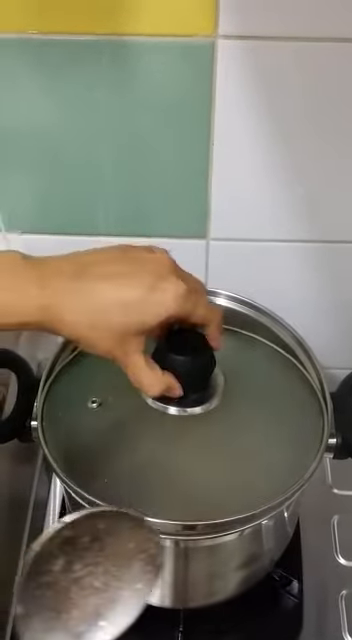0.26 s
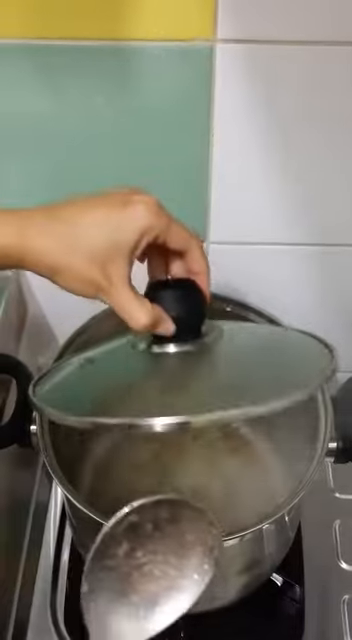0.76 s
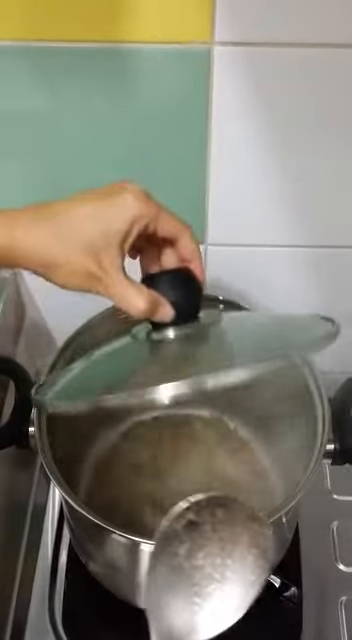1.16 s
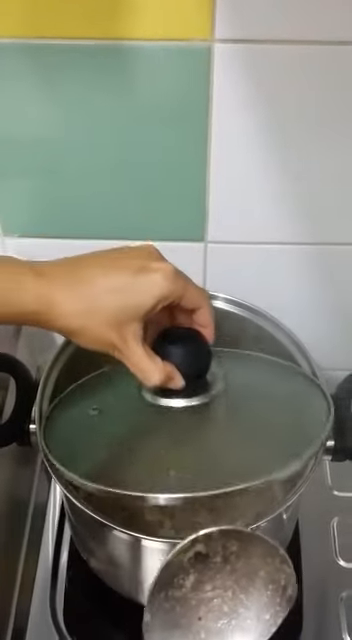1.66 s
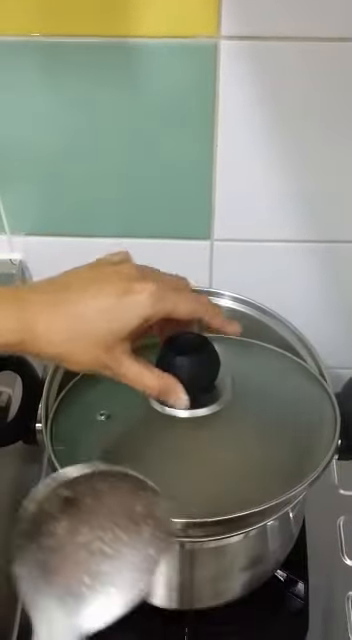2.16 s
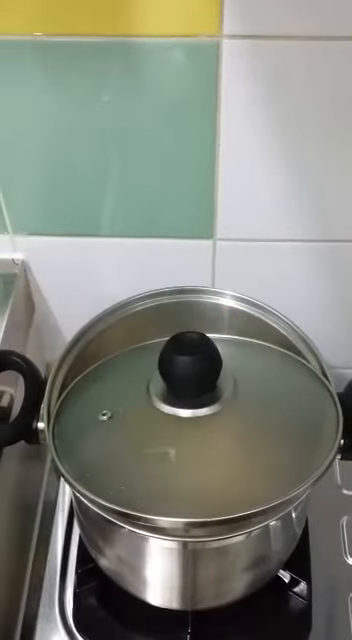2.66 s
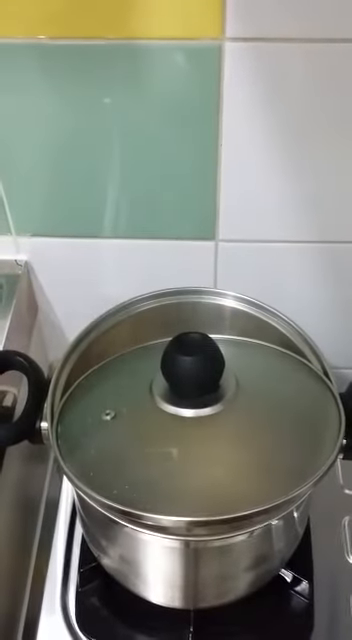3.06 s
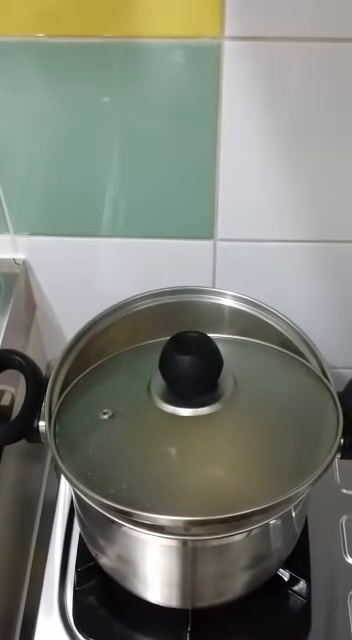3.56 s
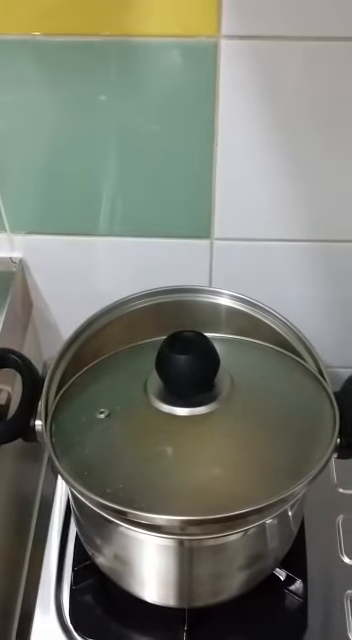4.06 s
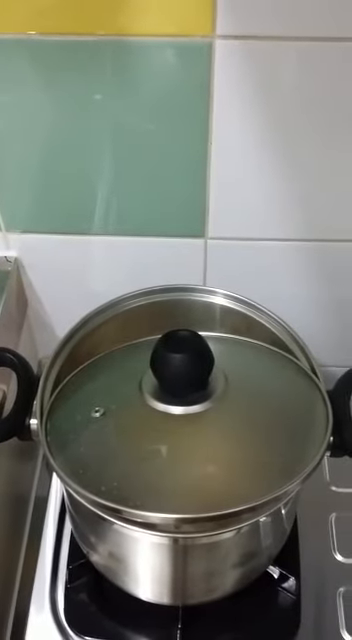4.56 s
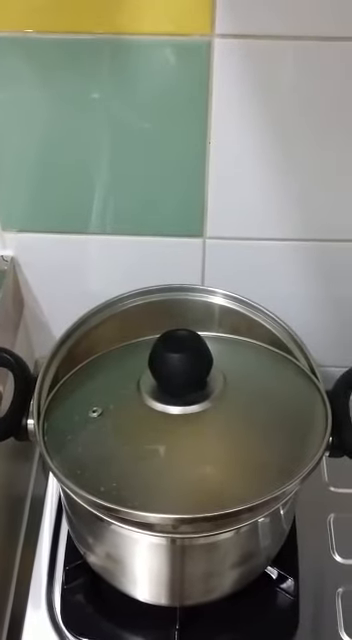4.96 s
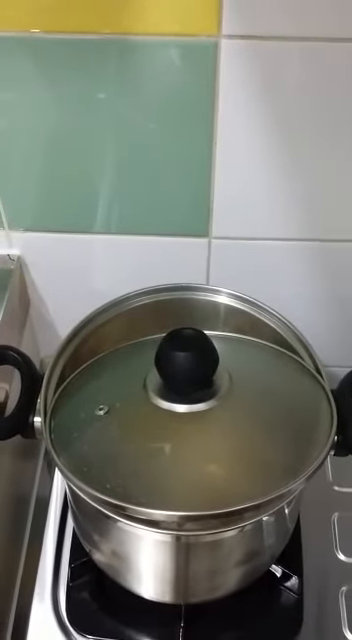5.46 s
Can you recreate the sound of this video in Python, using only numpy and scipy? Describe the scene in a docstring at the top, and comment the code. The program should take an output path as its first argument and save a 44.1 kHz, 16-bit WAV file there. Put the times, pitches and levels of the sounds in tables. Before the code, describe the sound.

A continuous crackling hiss of hot oil, with a resonant metallic pot tone and a low fluttering burner roar. The lid opens and closes early, and something hollow knocks softly about a quarter of the way in. Scattered water drops crack and rattle, with a loud cluster late on. Near microphone, hard kitchen walls, slightly gurgly processed sound with softened top treble.

```python
"""Spice paste sizzles in hot oil in a steel pot: dense random bubble bursts, echoed by the walls and coloured.
The glass lid is lifted and lowered again, which retunes the noise-driven resonances of the air in the pot.
Drops of water spit as cracks with decaying noise, steam jets hiss in narrow bands, and something hollow
bumps dully as a sum of damped modes. Beneath lies the low noise of a gas flame, in a tiled kitchen.
A limiter ducks the loud moments, a noise gate shuts weak patches of the spectrum, and the treble is cut."""
import sys
import numpy as np
from scipy import signal
from scipy.fft import rfft, irfft, next_fast_len
from scipy.io import wavfile
from scipy.ndimage import uniform_filter1d, minimum_filter1d

SR = 44100
rng = np.random.default_rng(int(sys.argv[2]) if len(sys.argv) > 2 else 0)


def dump_mix(stems):
    """Bounce the given channels to the path in sys.argv[1] as a 16-bit WAV at rate SR."""
    frames = np.atleast_2d(stems).T  # one column per channel
    limited = np.clip(frames, -1, 1)  # hard clip at full scale
    pcm = np.round(limited * 32767).astype(np.int16)
    wavfile.write(sys.argv[1], SR, pcm)


N = 251772
TIME, HZ = np.arange(N) / SR, np.fft.rfftfreq(N, 1 / SR)  # [s], [Hz]

# strength of the frying: (time [s], swell [dB])
FRYING_SWELL = [(0.0, 1), (0.28, 0.3), (0.46, 1.8), (0.6, 3.4), (0.78, 1.5), (0.88, 1.8), (1.0, 1),
                (1.27, -0.6), (1.75, -0.2), (2.1, 0.5), (2.62, 2), (2.8, 1.2), (3.33, 0.5), (4.0, -0.5),
                (4.4, -0.5), (4.68, 0.1), (5.0, -1.2), (5.45, -0.5), (5.7, -1.5)]
# colour of the sizzle, before trims: (frequency [Hz], left density [dB per Hz], right density [dB per Hz])
SIZZLE_SPECTRUM = [(504, -75.5, -77), (1110, -73, -70), (1760, -69.5, -63.5), (2330, -68, -63),
                   (2650, -65.5, -60), (2830, -63.5, -62), (3020, -64.5, -61.5), (3930, -62.5, -61),
                   (5200, -62.5, -61), (5840, -60.5, -62), (6750, -56, -63), (7350, -57, -61.5),
                   (7970, -60, -57.5), (8380, -63, -54.5), (8760, -65.5, -50), (9260, -64.5, -54.5),
                   (9800, -65, -58), (11460, -66, -61), (14000, -65, -61.5)]
# motion of the lid: (time [s], opening [0-1], slide from its first seat to its last [0-1])
LID_MOTION = [(0, 0, 0.05), (.35, 0.45, 0), (.7, 0.85, 0.21), (1.05, 0.96, 0.51), (1.4, 0.9, .55),
              (1.8, 0.02, .9), (2.15, 0, 0.99)]
BODY_SWELL = 0.6  # share of each swell [dB] that the coarse bubbling and the pot follow
HISS_DB, BODY_DB = 0.18, 0.77  # trims of the hiss and of the coarse bubbling
FIZZ_DB, FIZZ_OPEN_DB, FIZZ_DB_PER_S = 0.56, 0.5, -0.2  # finest fizz: at first, gain with lid open, fading


def sizzle():
    """Superposition of random bursts: dense crackle, its diffuse wash and the ringing pot swell together."""
    swell_db = over_time(FRYING_SWELL)[0]
    opening, slide = over_time(LID_MOTION)
    crackle = bubbles(per_s=5000, spread_db=3.5, ring_s=0.059, direct=0.37, count=12)
    crackle = crackle * amp(0.31 * drift(top_hz=17))  # bubbles come in clusters
    wash = amp(-4) * rng.standard_normal((2, N))  # the room smears them to a smooth hiss
    grain = unit(crackle + wash + amp(-10.5) * pings() + amp(-12) * pops())
    sound = colour(grain, SIZZLE_SPECTRUM)
    spectrum = rfft(sound)
    fizz = irfft(spectrum * np.clip((HZ - 8500) / 2500, 0, 1), N)
    body = irfft(spectrum * np.clip((4500 - HZ) / 2500, 0, 1), N)
    fizz_db = FIZZ_DB + FIZZ_OPEN_DB * opening + FIZZ_DB_PER_S * TIME
    hiss = sound - body + fizz * (amp(fizz_db) - 1)
    hiss = hiss * amp(swell_db + HISS_DB)
    hiss = hiss * pan(0.62 * slide - .6)  # the gap beside the lid turns the hiss leftward
    return hiss + (body * amp(BODY_DB) + pot_air()) * amp(BODY_SWELL * swell_db)


def bubbles(per_s, spread_db, ring_s, direct, count):
    """Convolution of impulses with wall echoes: tiny steam bubbles burst at many spots between steel walls."""
    t, out = np.arange(SR // 16) / SR, np.zeros((2, N))
    bursts = random_sizes(spread_db, most=4) * (rng.random(N) < per_s / SR)
    spot = rng.integers(0, count, N)
    for k in range(count):
        walls = unit(rng.standard_normal((2, len(t))) * amp(-60 * t / ring_s))
        snap = unit(rng.standard_normal((2, len(t))) * np.exp(-t / 0.00062))
        here = (bursts * (spot == k))[None]
        out += signal.oaconvolve(here, walls + direct * snap, axes=1)[:, :N]
    return unit(out)


def pings(count=2400, spread_db=3.0, ring_s=0.088):
    """Damped oscillation: larger bubbles ring for an instant, each at its own pitch, and coarsen the grain."""
    t, out = np.arange(SR // 32) / SR, np.zeros((2, N))
    onset = 1 - np.exp(-t / 0.00053)
    for when, pitch, size, side, lag in rng.random((count, 5)):
        turns = (1800 + 12500 * pitch) * t + np.array([[0], [lag]])  # cycles; lag is on the right
        db = spread_db * min(-np.log(size), 3) - 60 * t / ring_s
        ping = np.sin(2 * np.pi * turns) * amp(db) * onset
        add(out, when * N / SR, ping * pan(12 * (side - .5)))
    return unit(out)


def pops(per_s=260, spread_db=4.0, count=6):
    """Interaural delay: sharp pops of fat reach the two microphones with another delay from each spot."""
    out = np.zeros((2, N))
    for lag in rng.integers(-5, 6, count):  # samples
        train = random_sizes(spread_db, most=3) * (rng.random(N) < per_s / count / SR)
        out += np.array([train, np.roll(train, lag)])
    return unit(out)


def random_sizes(spread_db, most):
    """Exponential statistics: impulse heights whose levels scatter upward, with either sign."""
    return amp(spread_db * np.minimum(rng.exponential(1, N), most)) * rng.choice([-1, 1], N)


# brief dips of the sizzle: (centre time [s], width between 1/e points [s], change [dB])
SIZZLE_DIPS = [(0.205, .05, -1.5), (0.863, 0.025, -3.5), (1.247, 0.079, -1), (1.466, 0.024, -3),
               (2.83, 0.045, -3), (5.57, 0.022, -2.5)]


def lulls():
    """Amplitude modulation: Gaussian dips in the gain of the sizzle and the pot air."""
    return amp(sum(db * np.exp(-(2 * (TIME - s) / length) ** 2) for s, length, db in SIZZLE_DIPS))


# air modes of the pot, before trims: (frequency at first seat [Hz], frequency at last seat [Hz],
# bandwidth [Hz], level at first seat [dB], level at last seat [dB], change with lid open [dB],
# phase lead of the left [rad], left-right difference [dB])
AIR_MODES = [(322, 323, 35, -36.5, -44.5, -9.5, 0, -4.5), (398, 392, 26, -68, -46, -6, 1.5, -4.5),
             (441, 425, 46, -48.5, -51, 7.5, 0.5, -3), (831, 855, 22, -48, -49.5, -4, 1, -3),
             (960, 959, 11, -46, -49.5, -3, 1, -6), (1212, 1170, 63, -46.5, -49.5, -3.5, 0, -6),
             (1345, 1305, 80, -38.5, -39.5, -1, -2, -6), (1450, 1440, 65, -35.5, -40, -6, 4.5, -4.5),
             (2014, 1927, 60, -44, -41.5, -1.5, 1.34, -1), (2226, 2102, 78, -37.3, -38.2, -0.5, 0, -4.5),
             (2690, 2430, 55, -42, -38, -10, 0, -0.5), (3950, 3620, 170, -36, -47, -6, -3, 4.5),
             (4680, 4597, 75, -34, -35.5, -2, 2, -2), (5710, 5430, 120, -41, -34.5, -1, 2.5, 2)]
POT_WANDER, POT_SWELL_DB = 0.00607, 1.32  # shifting steam: rms detuning (share of pitch), rms swell


def pot_air():
    """Cavity resonance: the frying keeps the air modes ringing; the lid retunes them and changes their levels."""
    opening, slide = over_time(LID_MOTION)
    out = np.zeros((2, N))
    for first_hz, last_hz, width, first_db, last_db, open_db, lead, side_db in AIR_MODES:
        hz = first_hz + (last_hz - first_hz) * slide
        hz = hz * (1 + POT_WANDER * drift(top_hz=9))
        carrier = np.exp(2j * np.pi * np.cumsum(hz) / SR)
        r = np.exp(-np.pi * width / SR)
        # complex noise, low-passed twice, becomes a narrow band around the carrier
        noise = rng.standard_normal(N) + 1j * rng.standard_normal(N)
        noise = signal.lfilter([1 - r], [1, -r], noise)
        noise = unit(signal.lfilter([1 - r ** 2], [1, -r ** 2], noise))
        level_db = first_db + (last_db - first_db) * slide + open_db * opening
        ring = noise * carrier * amp(level_db + POT_SWELL_DB * drift(top_hz=11))
        out += np.sqrt(2) * np.array([ring * np.exp(1j * lead), ring]).real * pan(side_db)
    return out * amp(-1.5)


# loud spitting drops, before colouring: (time [s], level [dB], t60 [s], left-right difference [dB])
LOUD_DROPS = [(.080, -11, .06, -2), (.5586, -14, .056, 9), (.9393, -17, 0.067, 4), (.997, -14, .05, 0),
              (1.216, -16, .04, 5), (1.796, -17, .035, 0), (2.093, -12.5, .04, 2), (2.585, -10.5, 0.055, 2),
              (2.702, -12, .08, 0), (2.8466, -11, 0.041, -1), (3.310, -14, .05, 0), (3.493, -16, .035, 0),
              (3.683, -13.5, 0.049, -4), (4.145, -13, .08, 1), (4.2208, -6.5, 0.08, -1),
              (4.2262, -9.5, 0.07, 1), (4.2570, -8.5, 0.075, 2), (4.334, -17, .03, 0),
              (4.350, -15, .035, 0), (5.207, -17, .04, 2), (5.368, -11.5, 0.039, -4),
              (5.5694, -13, 0.034, -3)]
SNAP_DB, SNAP_S = 2, .0003  # bursting crack: level over its spurt, decay time


def spits():
    """Flash boiling: a drop of water turns to steam with a sharp crack and a spurt that rattles round the pot."""
    t, out = np.arange(SR // 5) / SR, np.zeros((2, N))
    crack = amp(SNAP_DB) * np.exp(-abs(t - .0013) / SNAP_S)
    for s, db, ring_s, side_db in list(LOUD_DROPS) + small_drops():
        spurt = amp(-60 * t / ring_s) * (1 - 0.5 * np.exp(-t / 0.0024))
        noise = rng.standard_normal((2, len(t)))
        add(out, s, amp(db) * noise * (spurt + crack) * pan(side_db))
    # nearly the colour of the sizzle, without its lows
    tone = amp(0.98 * over_hz(SIZZLE_SPECTRUM, HZ)) * HZ ** 2 / (HZ ** 2 + 2400 ** 2)
    out = irfft(rfft(out) * unit(tone), N)
    return out + amp(-14.0) * kitchen(out)


# faint drops: mean rate, level and its scatter, t60, scatter of the left-right difference
DROPS_PER_S, DROP_DB, DROP_SCATTER_DB, DROP_RING_S, DROP_SIDE_DB = 5, -27, 1, 0.027, 5


def small_drops(count=40):
    """Poisson process: faint drops fall at random moments, as rows like those of LOUD_DROPS."""
    times = np.cumsum(rng.exponential(1, count) / DROPS_PER_S)
    scatter = rng.standard_normal((count, 2))
    return [(s, DROP_DB + DROP_SCATTER_DB * size, DROP_RING_S, DROP_SIDE_DB * side)
            for s, (size, side) in zip(times, scatter)]


# jets of steam: (time [s], length [s], centre frequency [Hz], bandwidth at -6 dB [Hz], level before fades [dB])
STEAM_JETS = [(0.546, 0.097, 4500, 1600, -27), (2.428, 0.044, 2388, 119.2, -34),
              (2.979, 0.11, 4596, 252, -30), (4.41, .22, 2323, 450, -35), (4.615, 0.11, 4610, 120.4, -35),
              (4.722, 0.062, 4600, 110.4, -28)]


def jets():
    """Jet noise: pockets of steam escape through the paste, each a brief pitched band of noise."""
    t, out = np.arange(SR // 3) / SR, np.zeros((2, N))
    hz = np.fft.rfftfreq(len(t), 1 / SR)
    for s, length, pitch_hz, width, db in STEAM_JETS:
        resonance = 1 / (1 + (2 * (hz - pitch_hz) / width) ** 2)
        hiss = irfft(rfft(rng.standard_normal((2, len(t)))) * resonance, len(t))
        add(out, s, amp(db) * unit(hiss) * np.sin(np.pi * np.minimum(t / length, 1)))
    return out


# dull bumps, before trims: (time [s], level [dB], brightness [dB per octave; also dB on scuff and tick],
# pitch ratio, scuff level [dB])
BUMP_BLOWS = [(1.369, -31, 0, 1, -4), (1.376, -24.5, 1.5, 1.3, -5), (1.392, -30, 8, 1.04, 0),
              (1.411, -32, 2, 1, -1), (1.437, -26, 2.5, 1, -1), (1.462, -31, -2, 1, -3),
              (1.512, -34.5, 8, 1.05, -6), (1.562, -22.5, 0, 1.1, -4), (1.585, -29, 1, 1.15, -2),
              (1.607, -30.5, 4, 1, -1), (1.662, -34, 1, 1, 0), (1.885, -31.5, -5, 1.03, -4)]
# modes of the bumped thing: (frequency before the pitch ratio [Hz], relative level [dB], t60 [s])
HOLLOW_MODES = [(196, -7, 0.094), (260.8, -2, 0.1), (323, 2.5, 0.21), (388, 0.5, 0.11), (470, -6, 0.05),
                (615, -11, .05), (794, -8, 0.061), (1000, -7, 0.063), (1440, -2.5, 0.033),
                (1900, -8, 0.043)]


def bumps(attack_s=0.0015, tick_db=-3, tick_s=0.0024):
    """Modal synthesis: blows on something hollow, with a tick of contact and a scuff, spread by the room."""
    t, out = np.arange(SR // 3) / SR, np.zeros((2, N))
    for s, db, tilt_db, pitch, scuff_db in BUMP_BLOWS:
        ring = 0
        for hz, mode_db, t60 in HOLLOW_MODES:
            level = amp(mode_db + tilt_db * np.log2(hz / 400) - 60 * t / t60)
            turns = hz * pitch * rng.uniform(0.96, 1.02) * t + rng.random()
            ring = ring + level * np.sin(2 * np.pi * turns)
        scuff = band(rng.standard_normal((2, len(t))), low_hz=198, high_hz=850)
        scuff = unit(scuff + 0.37 * scuff[::-1])  # each side leaks into the other
        scuff = amp(scuff_db + tilt_db) * scuff * amp(-60 * t / 0.13)
        tick = unit(band(rng.standard_normal(len(t)), low_hz=500, high_hz=3500))
        tick = tick * amp(tick_db + tilt_db) * np.exp(-t / tick_s)
        add(out, s, amp(db) * (tick + (ring + scuff) * (1 - np.exp(-t / attack_s))))
    out = out + scrapes()
    return (amp(-4.0) * out + amp(-11) * kitchen(out)) * pan(-2.4)


# scrapes, before trims: (time [s], length [s], level before the fade [dB])
SCRAPE_DRAGS = [(1.385, .12, -30), (1.565, .18, -30.5)]


def scrapes(slips_per_s=260, spread_db=3):
    """Stick-slip friction: after the harder blows surfaces drag in uneven slips that die away."""
    t, out = np.arange(SR // 4) / SR, np.zeros((2, N))
    for s, length, db in SCRAPE_DRAGS:
        sizes = amp(spread_db * rng.standard_normal((2, len(t)))) * rng.choice([-1, 1], len(t))
        slips = sizes * (rng.random(len(t)) < slips_per_s / SR)
        drag = unit(band(slips, low_hz=347, high_hz=1300))
        add(out, s, amp(db) * drag * np.sqrt(np.maximum(1 - t / length, 0)))
    return out


# colour of the gas flame, before trims: (frequency [Hz], density [dB per Hz])
FLAME_SPECTRUM = [(20, -82), (48, -74), (62, -66.5), (84, -53), (118, -53), (140, -65.5), (230, -64.5),
                  (350, -67.5), (520, -71), (700, -69.5), (900, -72.5), (2000, -91)]
# likeness of the flame at the two microphones: (frequency [Hz], correlation [0-1])
FLAME_LIKENESS = [(25, 0.2), (90, 0.99), (250, 0.91), (450, 0.42), (800, 0.3)]
FLAME_DB, FLAME_OPEN_DB, FLAME_WAVER_DB = -0.65, -0.5, 0.93  # trim, change with lid open, rms slow wavering


def flame():
    """Combustion noise: a low, fluttering roar, most alike at the two microphones in its bass."""
    a, b = rfft(rng.standard_normal((2, N)))
    same = np.clip(over_hz(FLAME_LIKENESS, HZ)[0], 0, 1)
    pair = irfft(np.array([a, same * a + np.sqrt(1 - same ** 2) * b]), N)
    opening = over_time(LID_MOTION)[0]
    level_db = FLAME_DB + FLAME_OPEN_DB * opening + FLAME_WAVER_DB * drift(top_hz=3.2)
    return colour(pair, FLAME_SPECTRUM) * pan(-2.3) * amp(level_db)


# reverberation of the kitchen: (frequency [Hz], t60 [s])
ROOM_DECAY = [(150, 0.29), (500, 0.53), (2000, 0.61), (8000, 0.33), (15000, 0.16)]


def kitchen(x):
    """Reverberation: convolution with a noise tail in which each band decays at its own speed."""
    hz, t, z = signal.stft(rng.standard_normal((2, SR // 2)), SR, nperseg=256)
    decay = amp(-60 * t / over_hz(ROOM_DECAY, hz).T)
    onset = 1 - np.exp(-t / 0.0096)
    tail = signal.istft(z * decay * onset, SR, nperseg=256)[1]
    return signal.fftconvolve(x, tail / np.linalg.norm(tail[0]), axes=1)[:, :N]


# threshold of the noise gate at median loudness: (frequency [Hz], level against the usual one there [dB])
GATE_THRESHOLD = [(100, -12), (200, -4.8), (420, -4), (540, .3), (800, .3), (1080, -.9), (1300, -5.5),
                  (1650, -4.2), (2000, -6.5), (2600, -5.5), (3600, -4.2), (7000, -7.5)]


def suppress(x, loud_share=0.54, depth_db=28, knee_db=.4):
    """Spectral gating: patches below their usual level are shut, more so in loud moments; low mids gurgle."""
    hz, _, z = signal.stft(x, SR, nperseg=2048, noverlap=1536)
    power = (abs(z) ** 2).mean(0)
    power = uniform_filter1d(uniform_filter1d(power, size=4, axis=0), size=2, axis=1)
    power_db = 10 * np.log10(abs(power) + 1e-14)
    middle_db = np.median(power_db, axis=1)[:, None]
    # loud knocks count only up to 2.5 dB above the median
    usual_db = uniform_filter1d(np.minimum(power_db, middle_db + 2.5), size=36, axis=1)
    loud_db = 10 * np.log10(abs(power).sum(0) + 1e-14)
    shift_db = loud_share * (loud_db - np.median(loud_db))
    under_db = usual_db + over_hz(GATE_THRESHOLD, hz).T + shift_db - power_db
    z = z * amp(-depth_db * np.clip(under_db / knee_db, 0, 1))
    return signal.istft(z, SR, nperseg=2048, noverlap=1536)[1][:, :N]


def amp(db):
    """Logarithmic level: decibels to gain."""
    return 10 ** (np.asarray(db) / 20)


def unit(x):
    """Normalization: scales to rms 1."""
    return x / np.sqrt(np.mean(abs(x) ** 2) + 1e-20)


def over_time(rows):
    """Linear interpolation: each column of a curve table, sample by sample."""
    s, *columns = np.transpose(rows)
    return [np.interp(TIME, s, c) for c in columns]


def over_hz(rows, hz):
    """Interpolation on a log-frequency axis: each column of a spectrum table."""
    f, *columns = np.transpose(rows)
    return np.array([np.interp(np.log(hz + 1), np.log(f), c) for c in columns])


def colour(x, rows):
    """Spectral shaping: gives white sound of rms 1 a spectrum in dB per Hz."""
    return irfft(rfft(x) * amp(over_hz(rows, HZ)) * np.sqrt(SR / 2), N)


def band(x, low_hz, high_hz):
    """Band-pass filtering by a Butterworth filter."""
    return signal.sosfilt(signal.butter(2, [low_hz, high_hz], "band", fs=SR, output="sos"), x)


def pan(db):
    """Intensity stereophony: left and right gains for a level difference."""
    return amp(np.array([[.5], [-.5]]) * db)


def drift(top_hz):
    """Low-passed noise: a slow random curve of rms 1."""
    size = next_fast_len(N)
    hz = np.fft.rfftfreq(size, 1 / SR)
    shape = (hz > 1) / (1 + (hz / top_hz) ** 2)
    return unit(irfft(rfft(rng.standard_normal(size)) * shape, size)[:N])


def add(mix, s, sound):
    """Superposition: mixes a sound in at a time in seconds."""
    part = mix[:, round(s * SR):][:, :sound.shape[1]]
    part += sound[:, :part.shape[1]]


def scene():
    """Superposition of all sources: the pot on the stove."""
    return sizzle() * lulls() + spits() + jets() + bumps() + flame()


CEILING, EDGE_HZ = .85, 14520  # where peaks round off (share of full scale), upper band limit


def record(dry, threshold_db=-16, squeeze=0.46, recover_db_per_s=160):
    """Dynamic compression: a look-ahead limiter and rounded peaks, then the noise gate and the band limit."""
    power_db = 10 * np.log10(abs(uniform_filter1d((dry ** 2).mean(0), size=260)) + 1e-12)
    fall = TIME * recover_db_per_s
    held_db = np.maximum.accumulate(power_db + fall) - fall  # peaks recover at a steady rate
    over_db = np.maximum(held_db - threshold_db, 0)
    # the centred windows reach a few milliseconds ahead
    duck_db = uniform_filter1d(minimum_filter1d(-squeeze * over_db, size=640), size=300)
    ducked = dry * amp(duck_db)
    rounded = ducked / (1 + (ducked / CEILING) ** 4) ** .25
    edge = signal.firwin(1023, EDGE_HZ, window=("kaiser", 9), fs=SR)
    return signal.oaconvolve(suppress(rounded), edge[None], "same")


dry = scene()
out = record(dry)
dump_mix(out)
```